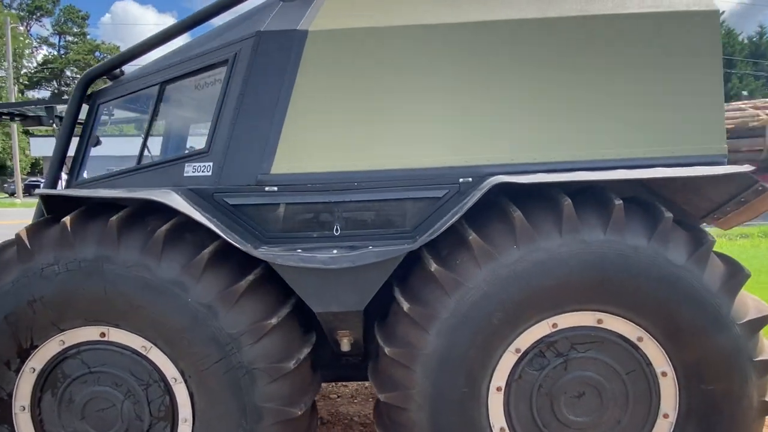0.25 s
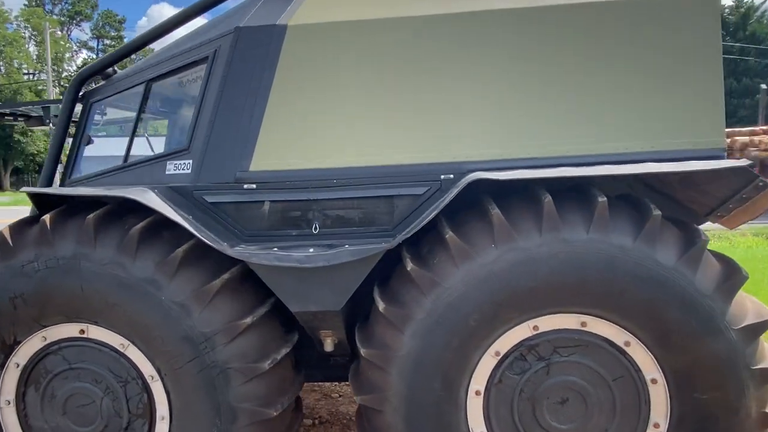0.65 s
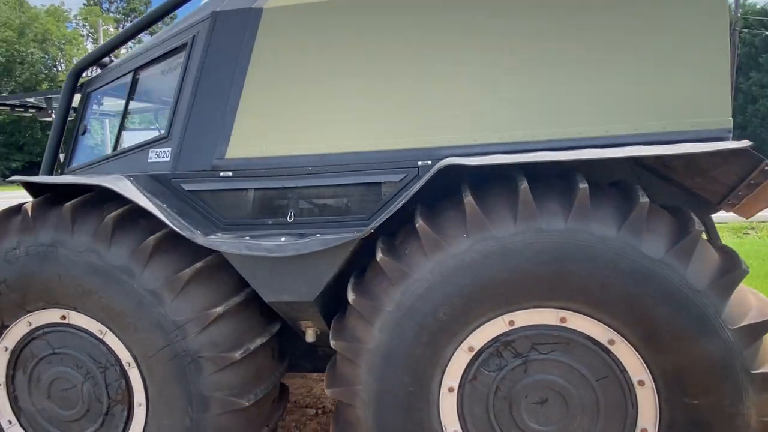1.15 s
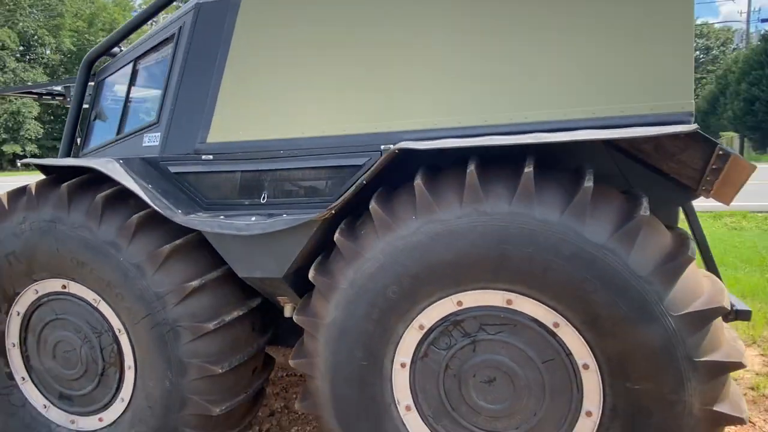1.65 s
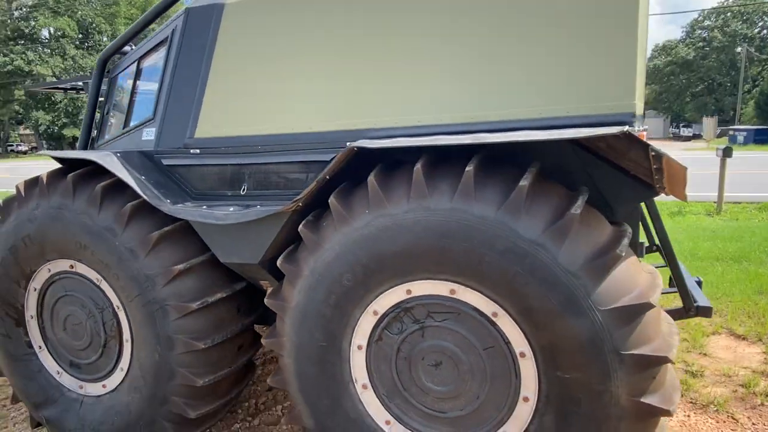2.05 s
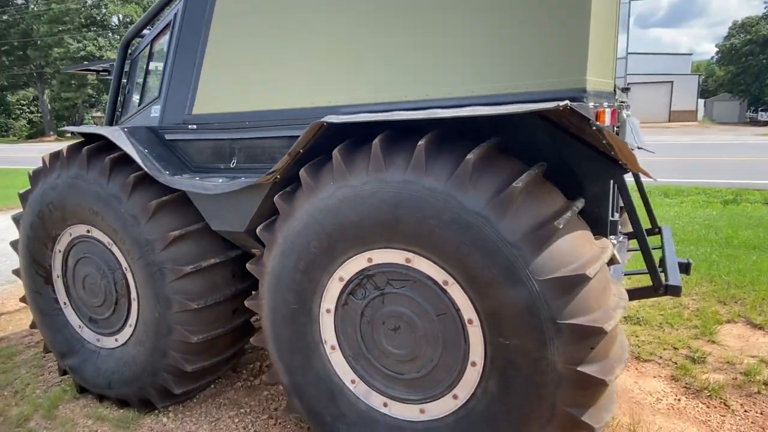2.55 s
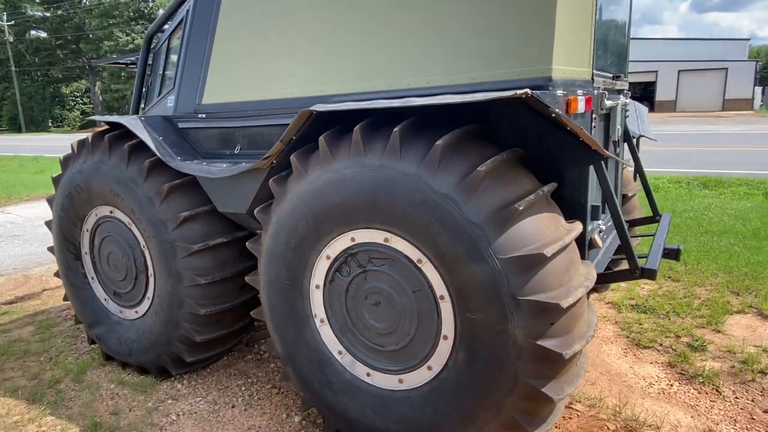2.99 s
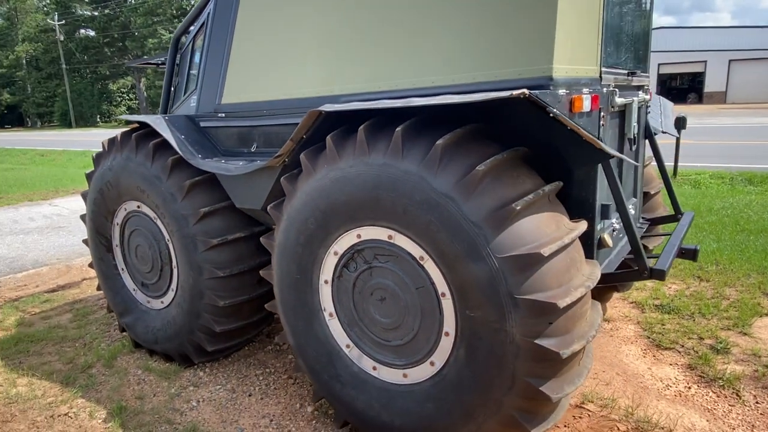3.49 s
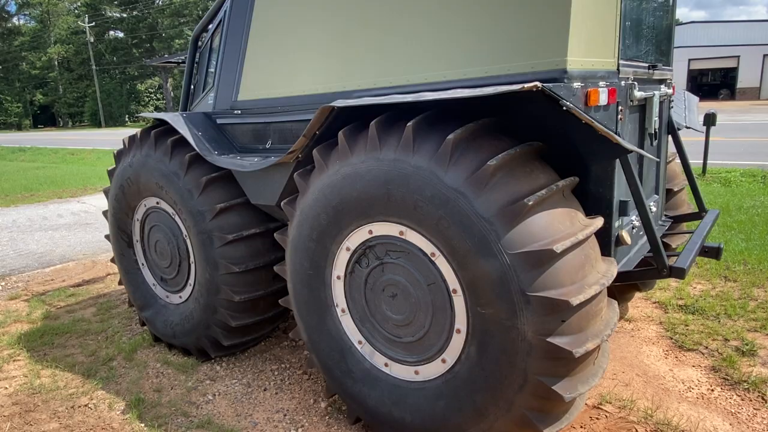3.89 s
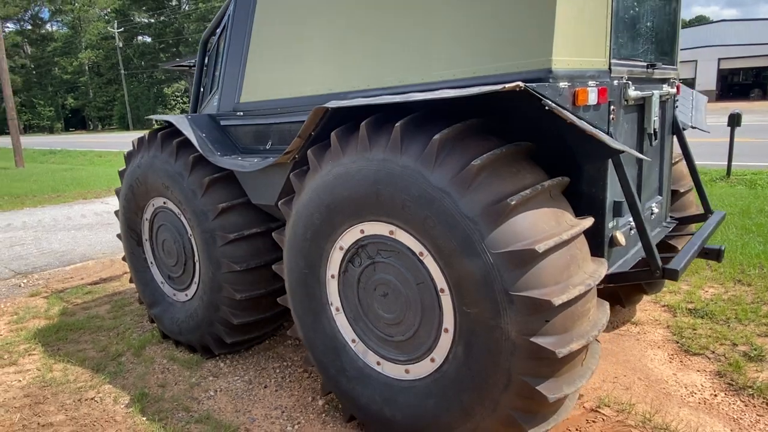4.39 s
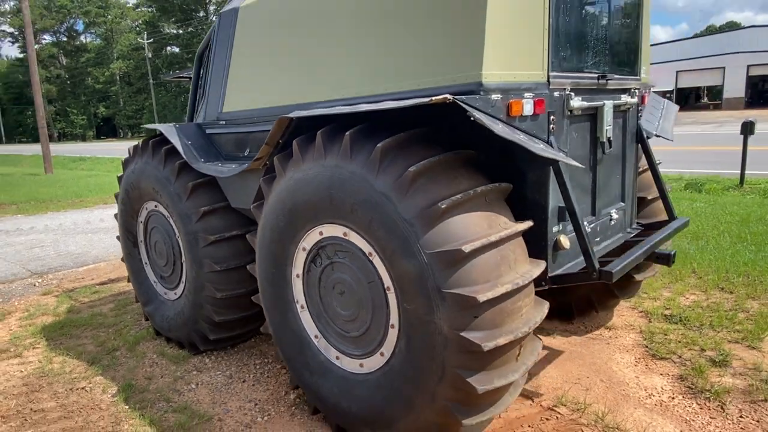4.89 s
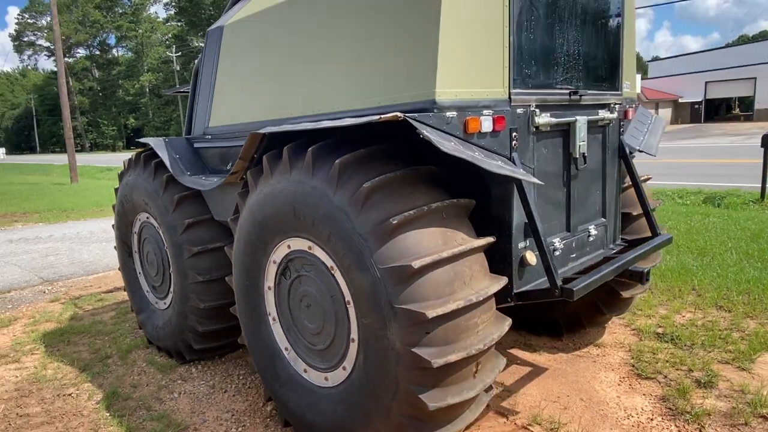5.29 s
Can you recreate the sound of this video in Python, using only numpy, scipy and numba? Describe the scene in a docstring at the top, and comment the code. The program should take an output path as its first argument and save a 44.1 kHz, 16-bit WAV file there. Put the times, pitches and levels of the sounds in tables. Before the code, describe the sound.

Close diesel chug and clatter with crunching grit under slow tyres; the engine sags, revs up, sinks and moves away, frame knocking at the end.

```python
"""A diesel all-terrain vehicle on huge soft tyres crawls past at arm's length, first over gravel, then dirt.
Six uneven pulses a cycle excite muffler, pipe and hull; noise gated by injections clatters; fan air rushes.
Grit crackles as random grains, loud at first, over a distant road and insects of pulsed band noise.
The engine eases off, revs once more and sinks again while the vehicle moves away.
Near the end the rear frame knocks: short blows ring a few damped modes."""
import sys
import numpy as np
from scipy import signal
from scipy.fft import rfft, irfft, next_fast_len
from scipy.io import wavfile
from scipy.ndimage import uniform_filter1d
from numba import njit

SR = 44100
rng = np.random.default_rng(int(sys.argv[2]) if len(sys.argv) > 2 else 0)


def wrap_up_sound(samples):
    """Save the sound to the file named by the first command line argument, as 16-bit audio."""
    columns = np.atleast_2d(samples).T
    # keep every value between -1 and 1, then stretch to whole-number steps
    tamed = np.clip(columns, -1, 1)
    steps = np.round(tamed * 32767).astype(np.int16)
    wavfile.write(sys.argv[1], SR, steps)


N = 244308
T = np.arange(N) / SR

BEATS_PER_CYCLE = 6
CRAWL_M_S, GAP_M = 0.78, 0.95  # crawling speed and closest distance
ENGINE_PASSES_S, TYRE_PASSES_S = 0.081, -0.88  # when the engine and the front tyre are closest
BAY_HIDDEN_S = (3.03, 3.7)  # from when to when the rear tyre comes to hide the engine bay


def undb(db):
    """Decibels are a logarithmic scale: 20 dB are a factor of ten in amplitude."""
    return 10 ** (np.asarray(db) / 20)


def unit(x):
    """Normalisation to an rms amplitude of 1."""
    return x / np.sqrt(np.mean(x ** 2))


def curve(rows):
    """Linear interpolation in time through (s, value) rows."""
    return np.interp(T, *np.transpose(rows))


def ramp(start, end):
    """A linear transition from 0 to 1 between two times."""
    return np.clip((T - start) / (end - start), 0, 1)


def swells(rows):
    """Gaussian bumps and dips of level in dB, from (s, half length s, dB) rows."""
    return sum(db * np.exp(-((T - s) / length) ** 2) for s, length, db in rows)


def noise():
    """White noise: equal power at all frequencies."""
    return rng.standard_normal(N)


def walk(rate):
    """Slow random fluctuation: held random values, smoothed, with a spread near 1."""
    hold = int(SR / rate)
    steps = np.repeat(rng.standard_normal(N // hold + 1), hold)
    return 2.17 * uniform_filter1d(steps, hold)[:N]


def burst(start, length):
    """Exponential decay: noise that starts at once and dies away."""
    age = T - start
    return noise() * (age >= 0) * np.exp(-np.clip(age / length, 0, 60))


def spectrum_at(hz, points):
    """Interpolation of (Hz, value) points on a log-frequency axis."""
    f, value = np.transpose(points)
    return np.interp(np.log(hz + 1), np.log(f + 1), value)


def colour(x, points, size=8192):
    """Minimum-phase filtering through (Hz, dB) points, from the folded cepstrum; output rms 1."""
    cepstrum = irfft(np.log(undb(spectrum_at(np.fft.rfftfreq(size, 1 / SR), points))))
    cepstrum[1:size // 2] *= 2
    cepstrum[size // 2 + 1:] = 0
    response = irfft(np.exp(rfft(cepstrum)))
    return unit(signal.fftconvolve(x, response)[:N])


@njit
def svf(x, tuning, damping):
    """A damped oscillator as a state-variable band-pass whose centre may move."""
    y, b, l = np.empty(len(x)), 0., 0.
    for i in range(len(x)):
        g, k = tuning[i], damping[i]
        v = (b + g * (x[i] + 1e-18 - l)) / (1 + g * (g + k))
        b, l, y[i] = 2 * v - b, l + 2 * g * v, k * v
    return y


def ring(x, hz, width, order=1):
    """Resonance: a mode passes its own band; order 2 gives steep skirts."""
    tuning = np.tan(np.pi * np.minimum(hz, .45 * SR) / SR) * np.ones(N)
    for _ in range(order):
        x = svf(x, tuning, width / hz * np.ones(N))
    return x


def ring_all(x, modes):
    """Superposition of resonances, from (Hz, width Hz, dB) rows."""
    return sum(undb(db) * ring(x, hz, width) for hz, width, db in modes)


def doublings(passes_s):
    """Distance law: how often the distance to a passing part has doubled since it was closest."""
    return np.log2(np.hypot(GAP_M, CRAWL_M_S * (T - passes_s)) / GAP_M)


def loudness(speed, load, db, fall_db, idle_db, octave_db):
    """Level in dB: loss per doubling of distance, loss without load, gain per octave of speed."""
    cruise_hz = 54
    level_db = db - fall_db * doublings(ENGINE_PASSES_S)
    return level_db - idle_db * (1 - load) + octave_db * np.log2(speed / cruise_hz)


def pulse_train(turn, rows, scatter_db, jitter_s):
    """A jittered periodic impulse train: one pulse for each (place, dB) row of every engine cycle."""
    places, sizes_db = np.transpose(rows)
    cycles = np.arange(turn[-1] // BEATS_PER_CYCLE + 1)[:, None] * BEATS_PER_CYCLE
    at = (cycles + places).ravel()
    chance = rng.standard_normal((len(at), 2))
    sample = (np.interp(at, turn, T, right=2 * T[-1]) + jitter_s * chance[:, 0]) * SR
    size = undb(np.tile(sizes_db, len(cycles)) + scatter_db * chance[:, 1])
    return np.bincount(np.abs(sample).astype(int), size, N)[:N]


def throb(pulses, loose, firm):
    """Source and filter: beats thump through the muffler, and loose rumble fills the gaps between them."""
    # Each row: frequency in Hz, level in dB of the beats' spectrum behind the muffler.
    muffler = [(22, -48), (32, 0), (45, -22.5), (80, -6.5), (115, 3), (145, 4.5), (200, -1.5), (245, -4),
               (280, -14), (330, -6.5), (400, -17), (500, -28), (700, -74.5), (1200, -74.5)]
    # Each row: frequency in Hz, level in dB of the rumble's spectrum.
    rumble = [(22, -37), (35, -3), (60, -4), (85, 5), (130, -0.5), (190, 2), (230, -7.5), (275, -8),
              (330, -13), (400, -21), (500, -34.5), (700, -51), (1200, -77)]
    thump = undb(-6) * firm * colour(pulses, muffler)
    return thump + undb(-1.5) * loose * colour(noise(), rumble)


def pipe_tones(cycle):
    """Harmonics of the engine cycle sound the pipe, each loudest at its own time."""
    # Each row: multiple of the beat rate, level in dB before load and speed scale it, time of peak in seconds.
    tone_rows = [(4 / 3, -28, 0.54), (3 / 2, -16.5, 1.56), (5 / 3, -20, 1.7), (2, -6.5, 0),
                 (7 / 3, -42, 0.29), (5 / 2, -12.5, 2.3), (8 / 3, -17, 1), (3, -7, 0.74),
                 (10 / 3, -24, 0.4), (7 / 2, -11.5, 0.21), (11 / 3, -8, 0.65), (4, -7, 1.04),
                 (5, -11.5, 1.95)]
    fade_db_per_s = 6
    tones = 0
    for multiple, db, loudest_s in tone_rows:
        level_db = db - fade_db_per_s * np.abs(T - loudest_s) + .5 * walk(2.84)
        phase = np.round(multiple * BEATS_PER_CYCLE) * cycle + .15 * walk(2)
        tones = tones + undb(level_db) * np.sqrt(2) * np.cos(phase)
    return tones


def blade_tone(turn):
    """Blade-passing tone: the cooling fan sounds at a fixed multiple of the beat rate."""
    return undb(-20 + walk(4.2)) * np.sqrt(2) * np.sin(2 * np.pi * 5.92 * turn)


def boom(turn, speed, load, loose):
    """Low harmonics locked to the beat rate; the boom swells while the engine gathers speed."""
    # Each row: centre in seconds, half length in seconds, change of level in dB.
    boom_swells = [(2.95, 0.51, 1.5), (3.35, 0.032, -10), (4.27, 0.059, 0), (4.66, 0.073, 8.5),
                   (5.4, 0.29, -16)]
    octaves_per_s = uniform_filter1d(np.gradient(np.log2(speed)) * SR, size=SR // 10)
    level_db = loudness(speed, load, db=-35.5, fall_db=2.5, idle_db=13.5, octave_db=17)
    level_db = level_db + 4 * octaves_per_s + swells(boom_swells) + 1.1 * walk(10)
    swing = 2 * np.pi * turn + .15 * loose * walk(10)
    second = undb(np.interp(load, [0, 1], (-3.5, -3)))
    third = undb(-13) * ramp(*BAY_HIDDEN_S)  # heard once the vehicle has turned its tail
    wave = np.sin(swing) + second * np.cos(2 * swing) + third * np.sin(3 * swing)
    return undb(level_db) * np.sqrt(2) * wave


def hull(pulses, loose, firm, speed):
    """Forced panel vibration: beats and noise drum a mode, and a panel hums when the engine labours."""
    # Each row: time in seconds, level in dB of the hull before the engine's last gain.
    hull_level = [(0, -31), (.45, -30), (1.1, -27.5), (1.7, -32), (2.15, -33.5), (2.3, -37.5), (2.68, -35),
                  (2.85, -45.5), (3.4, -49), (4, -45), (4.9, -54.5), (5.08, -43), (5.2, -60.5), (5.54, -57)]
    lug_hz, lug_width_hz = 44.6, 4.7  # the low beat rates at which the engine labours
    panel_hz = 306
    labour = np.exp(-((speed - lug_hz) / lug_width_hz) ** 2)
    hum = np.sin(2 * np.pi * panel_hz * T + .5 * walk(4.95))
    panel = undb(1.5 + 1.3 * walk(9.8)) * np.sqrt(labour) * hum
    drumming = unit(ring(firm * pulses + (loose + .4) * noise(), 303, 32, order=2))
    return undb(curve(hull_level)) * ((1 - .72 * np.sqrt(labour)) * drumming + panel)


def exhaust(turn, speed, load):
    """Periodic excitation: one train of uneven beats drives throb and hull; tones and boom share its phase."""
    # The six beats of one engine cycle. Each row: place in the cycle in beats, size in dB.
    beat_rows = [(.46, -4), (1.52, -5), (2.36, -7), (3.4, -6), (4.52, -1), (5.38, 0)]
    loose = undb(np.minimum(np.interp(load, [0, 1], (8, -9.5)), 0))  # all rumble when the load is low
    firm = np.sqrt(1 - loose ** 2)
    pulses = unit(pulse_train(turn, beat_rows, scatter_db=1.1, jitter_s=.00007))
    cycle = 2 * np.pi * (turn - beat_rows[-1][0]) / BEATS_PER_CYCLE  # angle from the strongest beat
    level_db = loudness(speed, load, db=-18.5, fall_db=6.5, idle_db=18.5, octave_db=3.5)
    pipe = throb(pulses, loose, firm) + firm ** 2 * pipe_tones(cycle) + firm ** 4 * blade_tone(turn)
    return undb(level_db) * pipe + hull(pulses, loose, firm, speed) + boom(turn, speed, load, loose)


def clatter(turn, speed, load):
    """Amplitude-gated noise: each injection rattles the block's modes; bodywork hides it or lets it out."""
    # The six injections of one cycle. Each row: place in the cycle in beats, size in dB.
    injections = [(.28, 0), (1.35, -3.5), (2.15, -4), (3.26, 0), (4.22, -3), (5.16, 0)]
    # Modes of the engine block. Each row: frequency in Hz, width in Hz, gain in dB.
    block = [(1870, 90, 9), (2330, 130, 6), (2750, 160, 2), (3340, 300, 2.5), (4080, 130, 6),
             (4600, 180, 2), (5700, 500, 5)]
    # Centre of the loudest band as the engine bay turns away. Each row: time in seconds, frequency in Hz.
    peak_hz = [(0, 3950), (.8, 3450), (1.2, 3520), (1.43, 2600), (1.62, 3020), (1.8, 3220), (2.15, 3080),
               (2.8, 2740)]
    # Spectrum of the remaining clatter. Each row: frequency in Hz, level in dB.
    spill_spectrum = [(900, -40), (1800, -3.5), (2400, 3), (2800, 8), (3400, 3.5), (4050, -14), (4900, -22),
                      (6200, -3.5), (8000, -2.5), (15000, -38)]
    # Gaps in the bodywork slide past. Each row: centre in seconds, half length in seconds, gain in dB.
    gaps = [(0.26, 0.16, 8.5), (0.99, 0.25, 3.5), (1.59, 0.2, 4.5), (1.45, 0.044, 2), (1.585, 0.026, 0),
            (2.85, 0.099, 9)]
    level_db = loudness(speed, load, db=-40, fall_db=2.5, idle_db=33.5, octave_db=-4)
    level_db = level_db - 20 * ramp(*BAY_HIDDEN_S) + swells(gaps)
    ticks = pulse_train(turn, injections, scatter_db=2.5, jitter_s=.0005)
    decays = signal.lfilter([1], [1, -np.exp(-1 / (.004 * SR))], ticks)  # 4 ms each
    gate = unit(uniform_filter1d(decays, size=50))
    rattle = noise() * (.45 + gate)
    rattle = rattle + ring_all(rattle, block)
    width_hz = 640 + 1290 * np.exp(-4 * doublings(ENGINE_PASSES_S))  # wider while alongside
    peak = unit(ring(rattle, curve(peak_hz), width_hz, order=2))
    spill = noise() * (1 + 0.44 * gate)
    spill = spill + ring_all(spill, block)
    return undb(level_db) * (undb(-3.5) * peak + undb(-4.0) * colour(spill, spill_spectrum))


def fan(turn, speed, load):
    """Turbulent flow noise, shaken by the engine, rings the bay and interferes with its ground reflection."""
    # Spectrum of the rush. Each row: frequency in Hz, level in dB.
    rush_spectrum = [(250, -13), (450, 6), (560, 3), (720, 2.5), (830, 2), (1200, -4.5), (1750, -2),
                     (2200, -4), (3000, -6), (5000, -11), (7000, -29), (12000, -29)]
    # Resonances of the engine bay. Each row: frequency in Hz, width in Hz, gain in dB.
    bay = [(645, 30, -3), (960, 85, 6), (1615, 100, 6), (1925, 70, 1)]
    # Bands that the reflection lifts or cancels. Each row: frequency in Hz when closest, octaves risen per
    # doubling of distance, width in Hz, gain in dB alongside, gain in dB once past (both before blurring).
    ground_bands = [(430, 0.1, 320, -7.5, 10), (575, 0.71, 400, -1.5, -6.5), (1124, 0.33, 450, -13.5, 8),
                    (939, 0.38, 520, -4.5, 8), (1360, 0.54, 410, 2, -2.5)]
    past = ramp(0.36, 1.38)  # the side of the hull turns away
    opening = undb(-16 * ramp(.8, 2.1))  # the bay rings less as its opening turns away
    depth = 1 - .7 * ramp(2.05, 2.9)  # rough ground blurs the bands further off
    shake = 1 + .14 * np.sin(2 * np.pi * (turn - .2))
    rush = colour(noise() * shake, rush_spectrum) * undb(0.81 * walk(25.44))
    rush = undb(-3.0) * (rush + opening * ring_all(rush, bay))
    for hz, rise, width, near_db, past_db in ground_bands:
        band = ring(rush, hz * 2 ** (rise * doublings(ENGINE_PASSES_S)), width, order=2)
        gain_db = depth * (near_db + (past_db - near_db) * past)
        rush = rush + (undb(gain_db) - 1) * band
    level_db = loudness(speed, load, db=-30, fall_db=9.5, idle_db=2.5, octave_db=1)
    shade_db = 5.5 * past + 4.5 * ramp(*BAY_HIDDEN_S)  # taken by the hull, then by the rear tyre
    return undb(level_db - shade_db) * rush


def tyres():
    """Granular noise: grit crackles and pops in small surges under the lugs, loud on gravel, faint on dirt."""
    # Spectrum of the crackle. Each row: frequency in Hz, level in dB.
    grit = [(1500, -25), (3000, -22), (4200, 8), (5200, 4.5), (6300, 12.5), (7500, 7.5), (8400, 7.5),
            (9800, 5), (11200, -1), (13500, -7.5), (15500, -6.5)]
    dirt_db = -14 * ramp(1.346, 1.47)  # the drop from gravel onto dirt
    level_db = -30 - 14.5 * doublings(TYRE_PASSES_S) + dirt_db
    grain_db = 2.2 * np.repeat(rng.exponential(size=N // 32 + 1), 32)[:N]
    grains = noise() * undb(grain_db)
    pops_per_s, spread_db = 260, 6
    pops = (rng.random(N) < pops_per_s / SR) * np.sign(noise())
    pops = pops * undb(spread_db * rng.uniform(-1, 1, N))
    crunch = undb(-3) * unit(ring(pops, hz=1870, width=1800, order=2))
    return undb(level_db + 1.18 * walk(29.08)) * (colour(grains, grit) + crunch)


def stones():
    """Transient decay: long crunches grind with a soft attack, brief ones snap; small ones tick at random."""
    # Each row: start in seconds, level in dB before attack and filtering, decay in seconds.
    stone_rows = [(.069, -23, .017), (.114, -22, .015), (.508, -22.5, .016), (.618, -24, .014),
                  (.672, -24, .012), (.951, -32, .023), (1.065, -30.5, .014), (1.179, -32, .012),
                  (1.231, -32, .012), (2.343, -48, .002), (2.45, -42, .0023), (2.722, -37, .0042),
                  (3.379, -47, .005), (3.556, -46, .001), (3.93, -47, .003), (4.566, -48, .003),
                  (4.73, -45, .002), (4.976, -46, .0018), (5.516, -47, .0015)]
    pebbles_per_s, pebble_decay_s = 2, .002
    snap_s = 0.0074  # the scale of decay times that parts snaps from grinds
    ticks = 1. * (rng.random(N) < pebbles_per_s / SR)
    envelope = signal.lfilter([1], [1, -np.exp(-1 / (pebble_decay_s * SR))], ticks)
    snaps = undb(-55) * noise() * envelope
    grinds = np.zeros(N)
    for s, db, length in stone_rows:
        # the attack takes a share of the decay time
        stone = undb(db) * burst(s, length) * ramp(s, s + .7 * length)
        snap_share = np.exp(-length / snap_s)
        snaps = snaps + snap_share * stone
        grinds = grinds + (1 - snap_share) * stone
    return ring(snaps, 5100, 16000, order=2) + ring(grinds, 7200, 18000, order=2)


def outdoors():
    """Filtered noise for a distant road; amplitude-modulated noise bands for insects."""
    # Spectrum of the road. Each row: frequency in Hz, level in dB.
    road = [(20, -60), (45, 5.5), (120, 2.5), (300, -11), (450, -10.5), (800, -14.5), (1500, -20.5),
            (2150, -26.5), (3000, -26.5), (4000, -37), (6200, -21.5), (7300, -34.5), (11000, -44),
            (14500, -64)]
    # Each row: frequency in Hz, width in Hz, level in dB before pulsing, mean pulse rate in Hz, start in seconds.
    insects = [(6140, 690, -65, 35, 8), (4830, 3400, -69.5, 29, 4.5), (10450, 1900, -76, 31, -8),
               (4000, 3500, -63.5, 30, 4), (14000, 2000, -86, 31, 3)]
    swell_s = 0.16
    out = undb(-47 + 1.0 * walk(2.88)) * colour(noise(), road)
    for hz, width, db, rate, start in insects:
        pulse_turns = np.cumsum(rate * (1 + 0.141 * walk(6))) / SR
        pulse = 1 + 0.25 * np.sin(2 * np.pi * pulse_turns)
        chorus = unit(ring(noise(), hz, width, order=2))
        out += undb(db) * ramp(start, start + swell_s) * pulse * chorus
    return out


def hard_beats():
    """Impact excitation: now and then one injection cracks out above the clatter."""
    # Each row: start in seconds, peak level in dB, frequency in Hz.
    cracks = [(.023, -25, 1700), (.094, -22, 4000), (.147, -21.5, 1700), (.202, -22, 1750),
              (.207, -23, 2100), (.224, -19, 4000), (.276, -24, 1600), (.311, -19.5, 3900),
              (.402, -24, 1650), (.495, -26, 1650), (1.563, -31, 2900), (1.602, -30, 3000)]
    decay_s, width_hz = .0026, 1100
    out = np.zeros(N)
    for s, db, hz in cracks:
        crack = ring(burst(s, decay_s), hz, width_hz, order=2)
        out += undb(db) * crack / np.max(np.abs(crack))
    return out


def whine(turn):
    """A tone locked to rotation: the drive's faint low whine sags and climbs with the engine."""
    heard = ramp(.35, .8) * (1 - ramp(3.05, 3.5))
    tone = np.sqrt(2) * np.sin(2 * np.pi * (14 / 3) * turn)
    return undb(-47 + 1.3 * walk(8.15)) * heard * tone


def frame():
    """Modal response: blows ring the rear frame; rubber mounts take the edge off every knock."""
    # Each row: start in seconds, peak level in dB, rattle decay in seconds, gain of the upper modes in dB.
    knocks = [(4.536, -38.5, .001, 1), (4.552, -46, .006, 3), (4.568, -35.5, .003, 5),
              (4.582, -45, .002, 8), (4.964, -38.5, .0006, -22), (5.415, -45, .006, 8),
              (5.424, -39, .008, 6), (5.433, -41, .09, 6), (5.44, -38, .008, 10), (5.4714, -27.5, .0003, 2),
              (5.483, -39, .003, 6)]
    # Lowest mode first. Each row: frequency in Hz, width in Hz, gain in dB (upper modes: before the knock's gain).
    modes = [(500, 150, 8), (900, 450, -2), (1220, 650, 0), (1680, 500, -6)]
    mounts = signal.butter(6, 2100, fs=SR, output="sos")  # low-pass, Hz
    out = np.zeros(N)
    for s, db, length, upper_db in knocks:
        tap = np.arange(N) == int(s * SR)
        blow = 14 * tap + burst(s, length) * ramp(s, s + 0.13 * length)
        knock = np.zeros(N)
        for k, (hz, width, mode_db) in enumerate(modes):
            knock += undb(mode_db + upper_db * (k > 0)) * ring(blow, hz, width, order=2)
        knock = signal.sosfilt(mounts, knock)
        out += undb(db) * knock / np.max(np.abs(knock))
    return out


def ports(x, phase):
    """Level and phase differences: two microphone ports hear a sound with their own colour and lag."""
    # Each row: frequency in Hz, left minus right in dB.
    balance = [(60, -2.7), (300, -3), (520, -1), (750, -9.5), (1290, -5), (2200, 5.5), (4400, -4),
               (8120, -4.5), (15000, 2.5)]
    size = next_fast_len(N + SR // 10)
    hz = np.fft.rfftfreq(size, 1 / SR)
    gain = undb(spectrum_at(hz, balance) / 2)
    lag = np.exp(1j * np.interp(hz, *np.transpose(phase)))
    spectrum = rfft(x, size)
    return np.array([irfft(spectrum * h, size)[:N] for h in (gain * lag, 1 / gain)])


def scatter(x):
    """Diffuse scattering: trees and buildings return a faint, short wash, different on each side."""
    decay_s = 0.021
    age = T[:SR // 4]
    tails = rng.standard_normal((2, len(age))) * np.exp(-age / decay_s)
    return undb(-12) * np.array([signal.fftconvolve(x, h / np.linalg.norm(h))[:N] for h in tails])


def scene():
    """Superposition: the vehicle, first alongside and then further off, in the open air."""
    # Engine speed. Each row: time in seconds, rate in beats per second.
    speed = curve([(0, 55.5), (.6, 54.2), (1.2, 53.2), (2.15, 51.7), (2.45, 46), (2.72, 42), (2.87, 48.5),
                   (3.2, 59.8), (3.5, 68), (3.78, 72.2), (4, 70.1), (4.09, 67), (4.25, 58), (4.47, 63.5),
                   (4.68, 56), (4.9, 51.3), (5.3, 51), (5.54, 48.5)])
    # How hard the engine pulls. Each row: time in seconds, load from 0 to 1.
    load = curve([(0, 0.97), (1.25, 0.98), (2.16, 0.99), (2.28, 0.52), (2.87, 0.37), (3.42, 0.61),
                  (4.15, 0.43), (5.08, 0.58), (5.2, 0), (5.54, 0.1)])
    # Port lag alongside. Each row: frequency in Hz, phase in radians by which left leads.
    near_phase = [(0, 0), (40, -.75), (130, -1), (350, -1.2), (750, -3), (1000, -6.3), (1700, -7.5),
                  (2500, -10), (3300, -11.8), (6000, -12.6), (7200, -9.8), (8500, -10), (10000, -12.6),
                  (15400, -22)]
    # Port lag further along the track. Each row: frequency in Hz, phase in radians by which left leads.
    far_phase = [(0, 0), (40, -.75), (350, -1.3), (750, -3), (1150, -7.5), (1800, -7.8), (2200, -6.6),
                 (3100, -6.7), (3700, -7.9), (4300, -6.2), (4900, -4.8), (6000, -6.3), (7200, -3.7),
                 (8500, -3.7), (10000, -6.3), (15400, -15.7)]
    turn = np.cumsum(speed) / SR  # engine beats so far

    def noisy_layers():
        """Independent noise at each call, so that the sides are only partly coherent."""
        return clatter(turn, speed, load) + fan(turn, speed, load) + tyres() + stones() + outdoors()

    engine = undb(3.0) * exhaust(turn, speed, load) + whine(turn)
    direct = engine + noisy_layers() + hard_beats()
    diffuse = undb(-9) * np.array([noisy_layers(), noisy_layers()])
    away = ramp(1, 2.4)
    passing = ports(direct * (1 - away), near_phase) + ports(direct * away, far_phase)
    return passing + diffuse + scatter(engine) + frame()


def record(dry):
    """Band limiting: the recorder's steep elliptic low-pass cuts the top."""
    top_hz = 15600
    return signal.sosfilt(signal.ellip(10, .2, 80, top_hz, fs=SR, output="sos"), dry)


dry = scene()
out = record(dry)
wrap_up_sound(out)
```